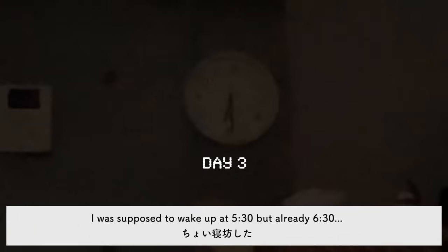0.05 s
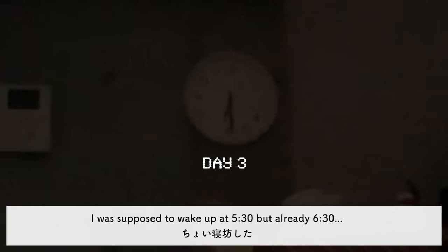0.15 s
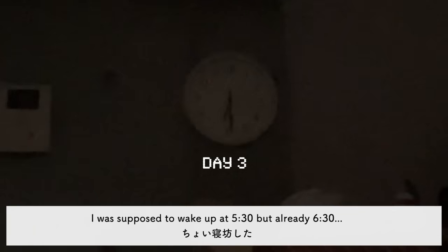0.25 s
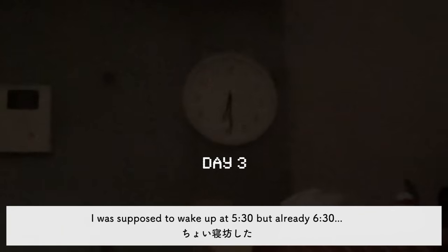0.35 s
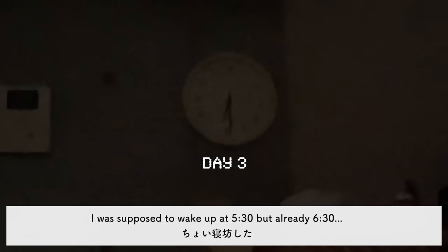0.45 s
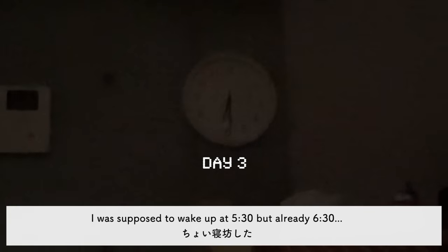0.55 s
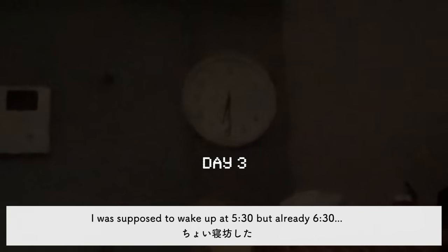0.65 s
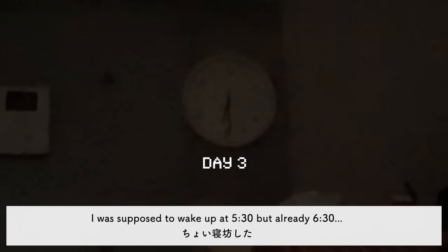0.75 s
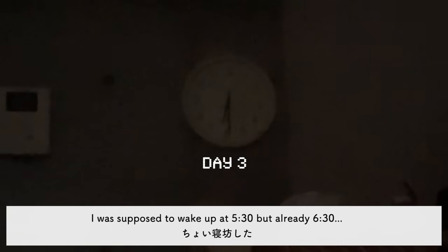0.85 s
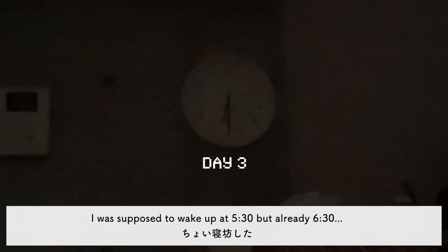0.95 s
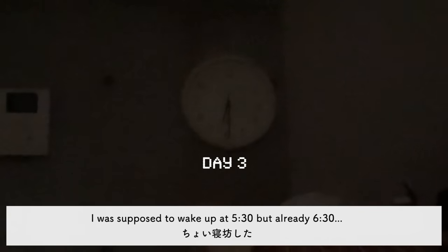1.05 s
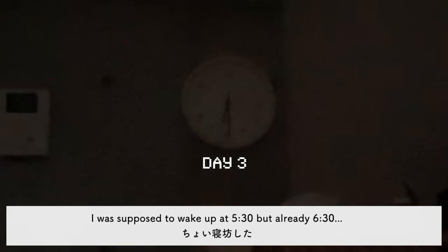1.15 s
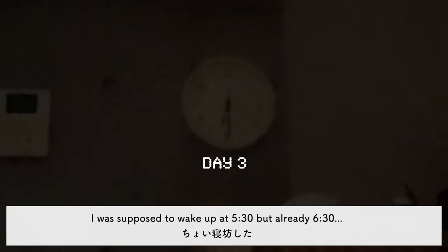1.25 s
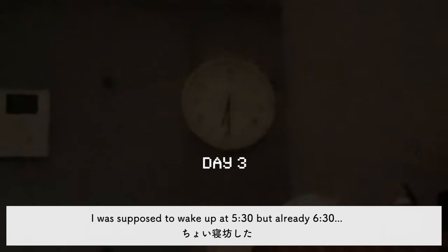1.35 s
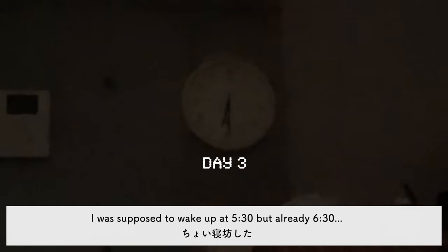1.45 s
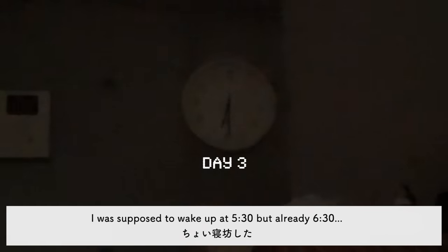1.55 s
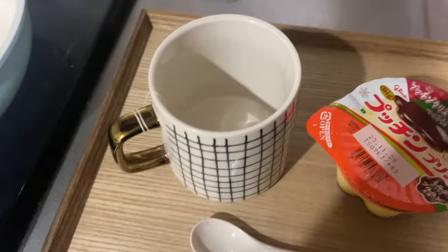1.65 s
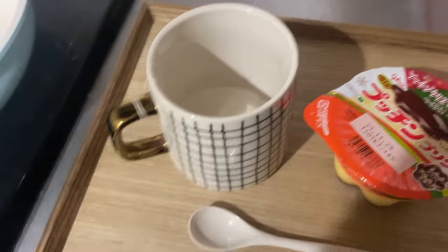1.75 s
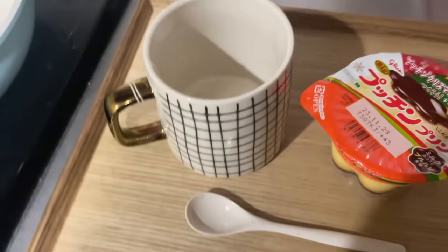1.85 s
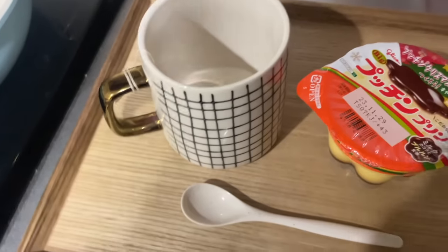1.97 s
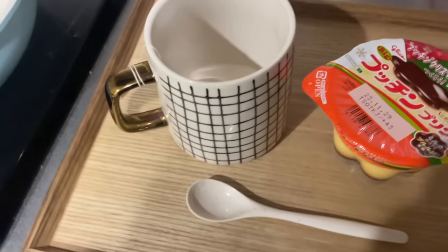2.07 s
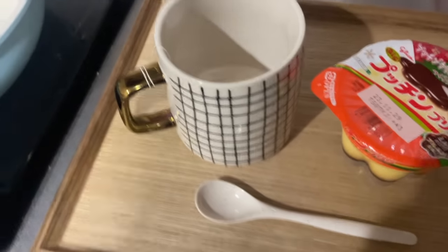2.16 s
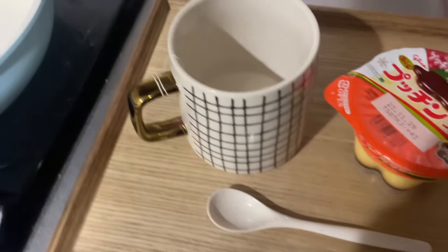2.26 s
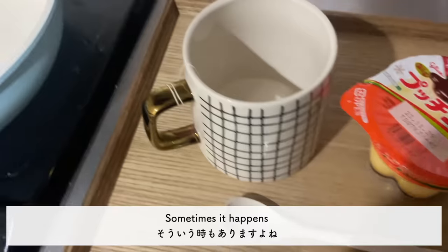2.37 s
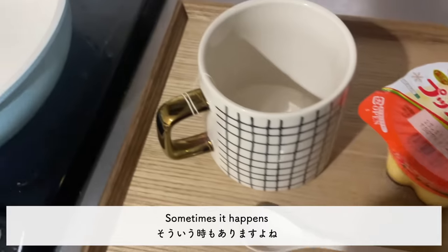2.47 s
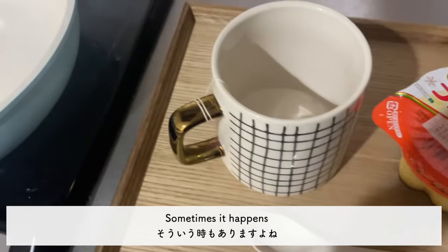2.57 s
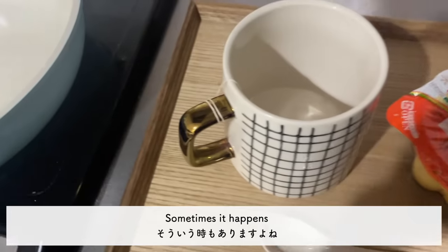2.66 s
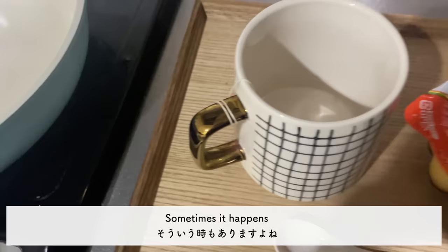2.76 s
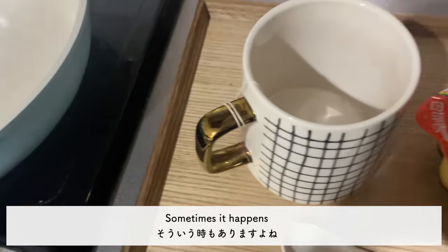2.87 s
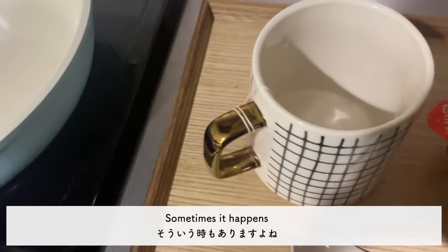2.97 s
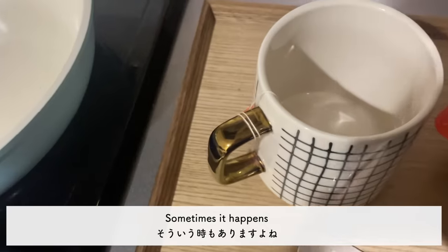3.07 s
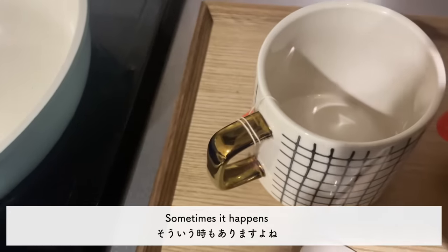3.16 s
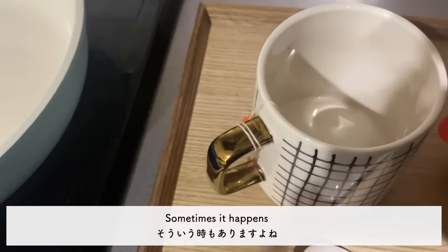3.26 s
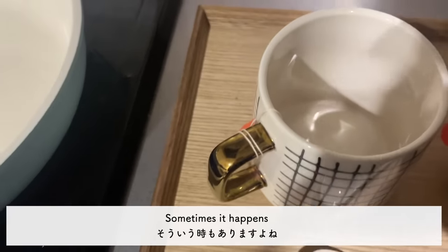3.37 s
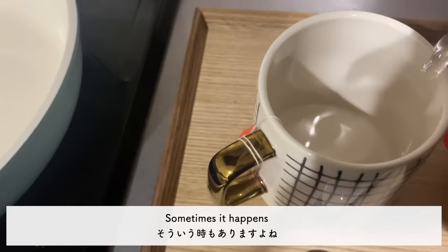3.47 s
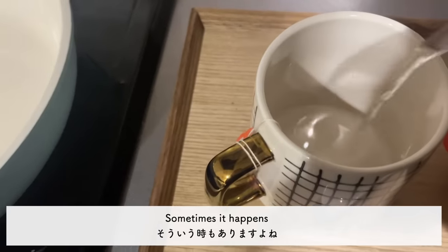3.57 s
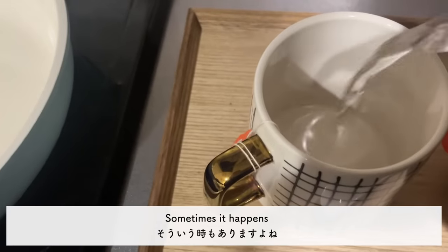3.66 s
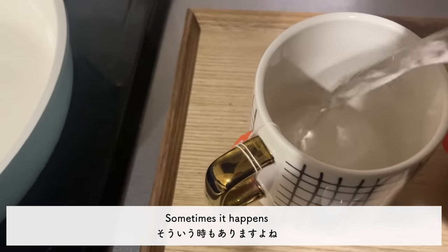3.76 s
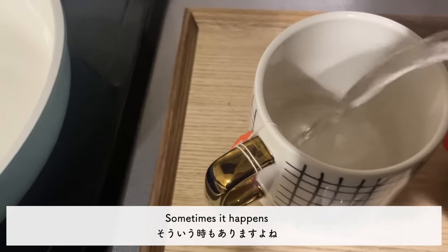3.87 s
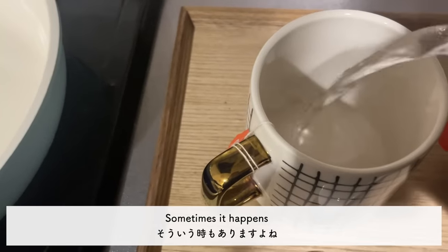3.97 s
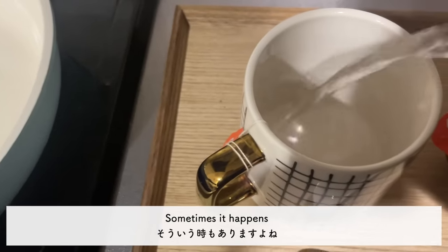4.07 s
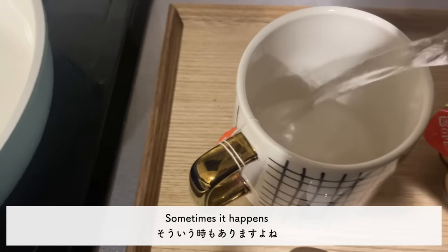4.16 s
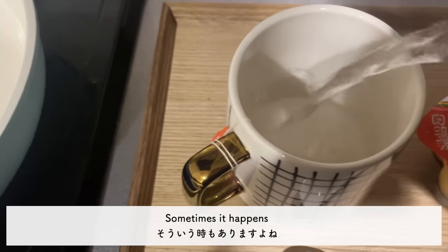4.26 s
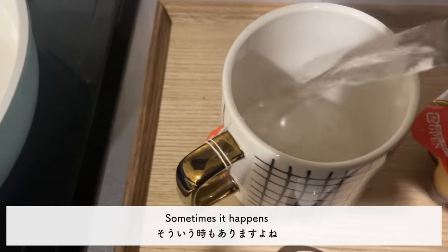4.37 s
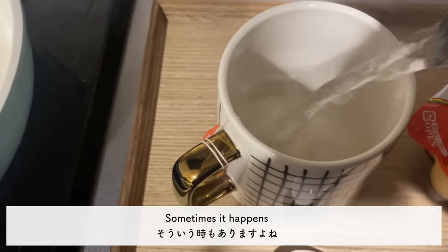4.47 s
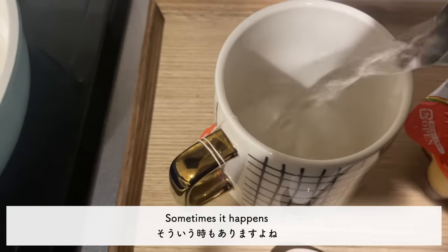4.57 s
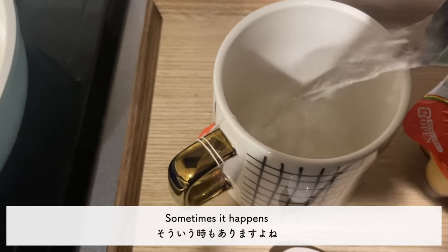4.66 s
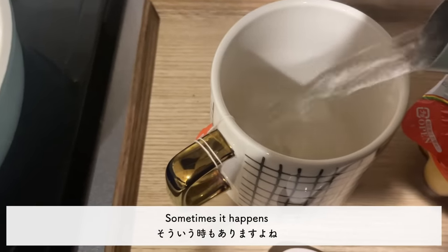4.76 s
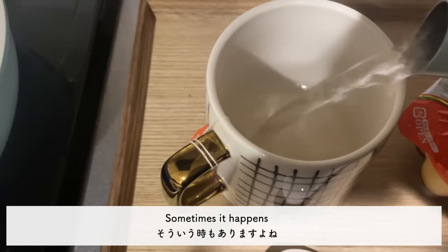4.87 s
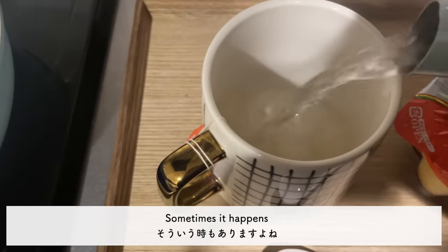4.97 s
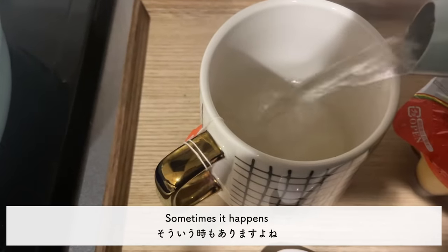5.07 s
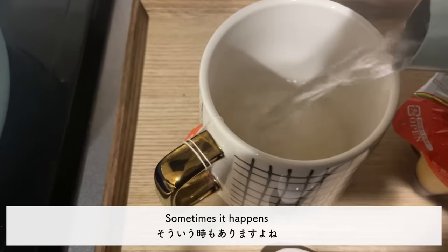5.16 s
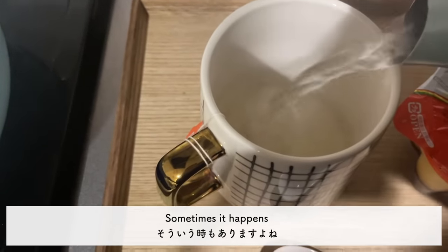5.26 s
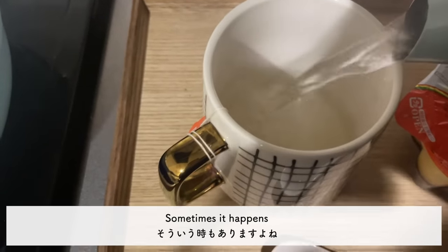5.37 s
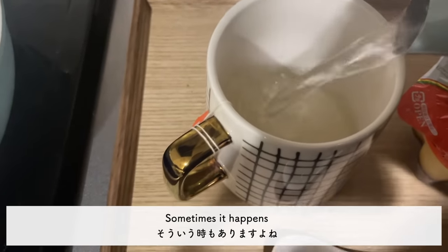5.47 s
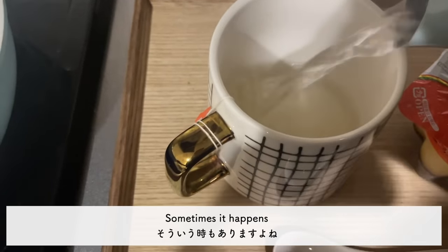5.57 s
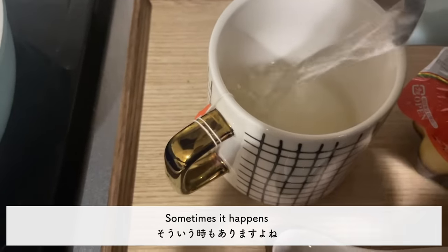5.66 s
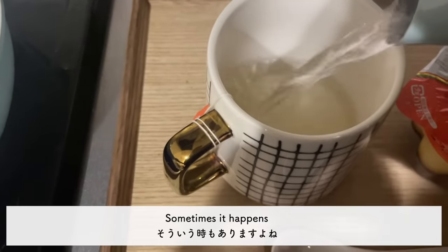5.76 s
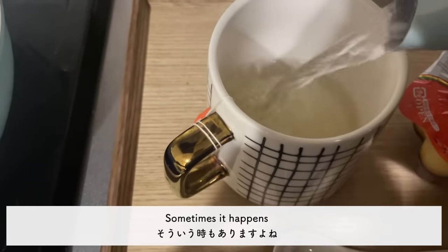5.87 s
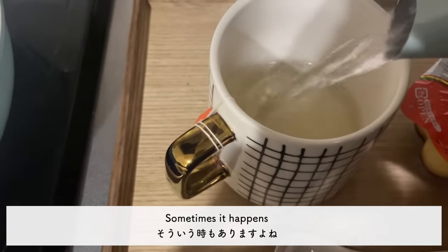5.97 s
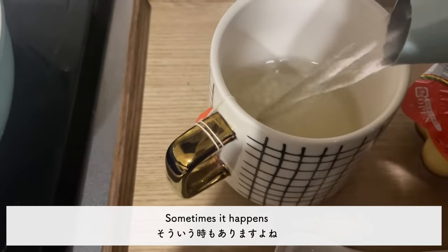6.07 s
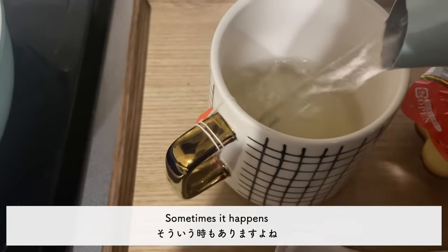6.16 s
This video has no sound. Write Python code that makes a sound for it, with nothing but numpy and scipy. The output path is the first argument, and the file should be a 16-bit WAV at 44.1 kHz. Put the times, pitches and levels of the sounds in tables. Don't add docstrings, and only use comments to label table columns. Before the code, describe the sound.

Near-silent room hush jumps to a closer kitchen with a dull floorboard thump, light clicks, a kettle knock, then water splashing into a ceramic mug.

```python
import sys
import numpy as np
from scipy import signal
from scipy.fft import rfft, irfft
from scipy.io import wavfile
from scipy.ndimage import uniform_filter1d

SR = 44100
rng = np.random.default_rng(int(sys.argv[2]) if len(sys.argv) > 2 else 0)


def elevation(decibels):
    levels = np.asarray(decibels, float)
    return 10 ** (levels / 20)


def store_wav(level_fs):
    pcm = np.round(np.clip(np.atleast_2d(level_fs), -1, 1) * 32767)
    wavfile.write(sys.argv[1], SR, pcm.T.astype(np.int16))


N = 274335
SCENE_CHANGE_S = 1.666

# frequency in Hz, density in dB per Hz.
QUIET_SPECTRUM = [(82, -36), (140, 0), (189, -16), (231, -3), (293, -10), (677, -10.5), (748, -12.5),
                  (896, -9.5), (1180, -17), (2070, -27), (7000, -34), (12300, -35.5), (13300, -34.5),
                  (14600, -55)]
# frequency in Hz, density in dB per Hz.
KITCHEN_SPECTRUM = [(82, -38), (140, 3.5), (189, -17.5), (287, -10), (454, -21), (830, -17.5), (970, -25.5),
                    (1330, -30), (1540, -32.5), (2680, -46), (7430, -55), (11500, -52), (13300, -48),
                    (15000, -75)]
QUIET_DB, KITCHEN_DB = -74.5, -59

# time in seconds, level in dB.
TREMOR = [(1.67, -42), (1.77, -37), (1.96, -49), (2.12, -46), (2.49, -53), (2.63, -48), (3.05, -45.5),
          (3.12, -53.5), (3.22, -45), (3.42, -46), (3.5, -39), (3.58, -37.5), (3.87, -50), (3.94, -43.5),
          (4.35, -48), (4.85, -43), (5.31, -50), (6.23, -48.5)]
# frequency in Hz, width in Hz, level in dB.
RUMBLE_MODES = [(53.53, 12.2, 10.5), (72.9, 11, 2), (90.5, 34.6, 5), (141, 20, -6)]
QUIET_RUMBLE_DB, QUIET_LURCH_DB = -62, 2

# start in seconds, peak in dB, board frequency in Hz,
# rattle in dB relative to the boom.
FOOTFALL = [
    (1.668, -30, 142.9, -15),
    (1.715, -28.5, 156.4, -12.5),
    (1.85, -41, 151.6, -17),
]
# frequency in Hz, width in Hz, level in dB.
BOARD_RATTLE = [(170, 21, -35), (370, 32, -8), (290, 66, -17.5), (820, 550, -27.5)]
LOAD_S, BOARD_DB_PER_S = 0.019, -210
# start in seconds, peak in dB, frequency in Hz,
# T60 in seconds.
BUMPS = [(0.63, -66, 1134, 0.098), (0.706, -68, 1020, .07), (0.712, -72, 1800, .05),
         (2.034, -23, 79, 0.088), (2.012, -41, 356, 0.03), (2.3, -62.5, 1390, 0.16),
         (2.301, -39, 1150, .04), (2.698, -49, 850, .045), (2.699, -52, 1600, .035),
         (2.843, -46, 258, 0.047), (3.215, -35.5, 300, 0.024), (3.506, -22.5, 97.4, 0.18),
         (3.509, -31, 54.1, 0.41), (3.503, -32, 150, 0.4), (3.499, -34.5, 392, 0.37),
         (3.556, -67.5, 6770, 0.13), (3.456, -25, 250, 0.058), (3.4854, -19, 1293, 0.038),
         (3.487, -24, 996, 0.025), (3.4875, -11.5, 580, 0.022), (3.4845, -23.5, 2270, 0.017),
         (3.513, -23.5, 385, 0.055), (3.488, -18.5, 800, .03), (3.488, -20.5, 460, 0.024),
         (3.498, -35, 680, 0.087), (3.498, -38, 554, 0.092), (3.5, -39.5, 824, 0.24),
         (2.024, -49, 4050, 0.012), (4.288, -39, 1600, .012)]
FLOOR_TOP_HZ = 320

# start in seconds, peak in dB, treble in dB relative to it, smear in seconds,
# focus in Hz.
CLICKS = [(1.76, -57.5, 1, 0.027, 4200), (2.021, -46, -9, 0.0072, 3920), (2.293, -58, -14, 0.0071, 3000),
          (2.3, -37, -3.5, 0.0022, 1470), (2.302, -38, -34, 0.01, 1150), (2.315, -39, -5, 0.0025, 3660),
          (2.599, -77, 10, .004, 1400), (2.61, -73, 14, .002, 1400), (2.692, -55, -18, 0.0034, 6500),
          (2.697, -43.5, -19, 0.011, 1000), (2.754, -55.5, -20, 0.0027, 3450),
          (3.455, -34, -6.5, 0.013, 900), (3.4852, -25.5, -24, 0.0068, 2200),
          (3.513, -41, -6, 0.0057, 6500), (3.556, -56.5, -2, 0.014, 4940), (3.585, -61, -3, 0.023, 2900)]
# frequency in Hz, density in dB per Hz.
CLICK_SPECTRUM = [(180, -11.5), (300, -2), (501, -7.5), (1180, -6.5), (1400, -15), (1960, -9),
                  (2760, -14.5), (9000, -28), (11700, -82), (19800, -120)]
# time in seconds, level in dB.
SLIDES = [
    [(2.08, -72), (2.098, -83), (2.106, -68), (2.2, -84)],
    [(2.36, -71), (2.378, -81), (2.434, -74), (2.46, -109)],
    [(3.12, -92), (3.244, -70), (3.414, -74), (3.446, -68), (3.454, -72), (3.46, -55)],
]
# frequency in Hz, density in dB per Hz.
SLIDE_SPECTRUM = [(590, -24), (1000, -7), (1790, -25), (1940, -22), (2870, -17), (6470, -26), (8360, -32),
                  (13100, -31), (16000, -48)]

# start in seconds, level in dB.
KNOCKS = [
    (3.453, -36),
    (3.484, -25.5),
    (3.488, -25),
    (3.513, -62),
]
# frequency in Hz, level in dB, T60 in seconds.
KETTLE = [(250, -16, 0.072), (387, -10.5, 0.07), (462, -4, 0.033), (556, -6, 0.019), (680, -3, 0.028),
          (820, 1, 0.035), (1280, -8, 0.027), (2200, -33, .018)]

# time in seconds, flow level in dB, break-up into spray in dB.
POUR = [(3.74, -80, -21), (3.86, -75, 8), (3.99, -69.5, 4), (4.11, -65, 2), (4.36, -62, 1.5),
        (4.47, -58, -4), (4.83, -53, 1.5), (5.04, -60.5, 0), (5.22, -59, -8), (5.36, -58.5, -4),
        (5.71, -62.5, -4), (5.91, -60, -1.5), (6.09, -58.5, -9), (6.22, -64.5, 0)]
# frequency in Hz, width in Hz, level in dB.
AIR_COLUMN = [(472, 91, 2), (860, 123, 10.5), (983, 170, 2.5), (1100, 380, 0.5), (1595, 220, 2)]
# frequency in Hz, width in Hz, level in dB.
WALL = [(2360, 260, -3), (3020, 260, 3), (3700, 800, -6), (4600, 360, -2), (5600, 1000, -9),
        (6950, 500, -4)]
# frequency in Hz, width in Hz, level in dB.
GLAZE = [(6500, 84, 1.5), (13400, 130, -3)]
# frequency in Hz, width in Hz, level in dB.
PORT = [(12260, 950, -4.5), (9670, 2430, -2.5), (13600, 2000, -10.5)]
# start in seconds, peak in dB, cavity frequency in Hz.
PLOPS = [(4.664, -31.5, 1760), (4.692, -34, 1050), (4.735, -36, 955), (4.78, -30.5, 890), (4.881, -41, 820),
         (4.962, -37.5, 860), (4.987, -39, 1410), (5.141, -33, 1430), (5.201, -33, 910),
         (5.213, -25.5, 1000), (5.263, -30.5, 980), (5.437, -41, 1250), (5.445, -25.5, 890),
         (5.48, -38.5, 1010), (5.531, -33, 960), (5.589, -29.5, 890), (5.639, -27, 870), (5.684, -26, 970),
         (5.738, -37, 910), (5.766, -24.5, 910), (5.788, -29.5, 1010), (5.807, -34, 895),
         (5.841, -32.5, 950), (5.898, -34.5, 940), (5.916, -32, 896), (5.977, -36, 950), (6.017, -39, 1300),
         (6.026, -27, 1030), (6.059, -33.5, 1010), (6.102, -31, 1005), (6.152, -41.5, 1100),
         (6.195, -30.5, 920)]
# start in seconds, peak in dB, cavity frequency in Hz.
BLIPS = [(4.4, -42, 1530), (4.533, -46, 840), (4.547, -37, 824), (4.609, -43, 1780), (4.625, -37, 840),
         (4.65, -38, 1470), (4.676, -34, 1190), (4.721, -39, 860), (4.76, -32.5, 840), (4.808, -36, 824),
         (4.895, -48, 1110), (4.929, -37.5, 1040), (5.0, -34, 1710), (5.017, -37.5, 786), (5.043, -36, 829),
         (5.107, -36, 1080), (5.154, -40, 915), (5.241, -29.5, 834), (5.267, -36, 1030), (5.283, -36, 1140),
         (5.298, -33, 1070), (5.327, -42, 929), (5.344, -33.5, 920), (5.359, -31.5, 926), (5.37, -44, 907),
         (5.396, -44, 1330), (5.408, -35.5, 929), (5.497, -34, 926), (5.516, -40, 1120), (5.693, -35, 982),
         (5.73, -41, 939), (5.845, -32, 918), (5.943, -43, 934), (5.955, -42, 1030), (5.994, -38, 945),
         (6.038, -38, 1030), (6.073, -39, 1050), (6.089, -40, 1010), (6.117, -40, 832)]
# start in seconds, peak in dB, bubble frequency in Hz.
SPLASHES = [(3.78, -54.5, 2530), (3.8395, -45.5, 3550), (3.972, -46, 2420), (4.0132, -40.5, 2430),
            (4.091, -45, 2300), (4.172, -33.5, 5530), (4.223, -36, 3370), (4.346, -40, 2850),
            (4.388, -37, 3720), (4.398, -30.5, 2800), (4.4335, -29, 2520), (4.4835, -36, 3030),
            (4.4961, -24.5, 3850), (4.538, -37, 2720), (4.5965, -37.5, 2380), (4.6035, -34, 2400),
            (4.6658, -30, 2600), (4.735, -40, 2900), (4.757, -34, 2540), (4.816, -33, 2940),
            (4.8768, -34, 3200), (4.971, -36.5, 2960), (4.999, -37, 2370), (5.0532, -41.5, 3060),
            (5.102, -37, 3040), (5.133, -37, 3100), (5.2356, -34.5, 3060), (5.3923, -35.5, 3460),
            (5.5172, -31, 2330), (6.0259, -27, 3060)]
# start in seconds, peak in dB, bubble frequency in Hz.
DRIPS = [(3.9585, -54, 2310), (4.024, -50, 2850), (4.0394, -55, 2840), (4.1487, -47, 5440),
         (4.1814, -42.5, 2000), (4.1868, -39.5, 2820), (4.218, -41.5, 3600), (4.2586, -47, 6500),
         (4.304, -46, 2670), (4.3534, -48, 2690), (4.4108, -34.5, 2700), (4.4478, -33.5, 2330),
         (4.4554, -37, 3700), (4.511, -39, 3000), (4.584, -46, 2330), (4.6107, -36.5, 2370),
         (4.7788, -35, 2930), (4.8602, -49, 2840), (4.895, -46, 2790), (4.9603, -37, 2860),
         (5.088, -44, 3100), (5.142, -40, 3150), (5.3018, -48, 7220), (5.3153, -42, 3060),
         (5.436, -40.5, 3060), (5.6126, -39, 6710), (5.6594, -48, 3070), (5.7346, -43, 2940),
         (5.8283, -37.5, 3120), (5.9554, -44, 2850), (5.994, -41.5, 3100)]
# start in seconds, peak in dB.
BURSTS = [(3.8082, -57), (3.8717, -45.5), (3.933, -56), (3.95, -48), (4.1156, -48), (4.1709, -47),
          (4.2722, -37), (4.3205, -39), (4.345, -38), (4.3874, -36.5), (4.4108, -33), (4.4235, -32),
          (4.4333, -36), (4.4443, -29), (4.4567, -24), (4.4788, -30), (4.497, -35), (4.511, -35),
          (4.571, -46.5), (4.6368, -40), (4.7112, -41), (4.7336, -38), (4.7555, -38), (4.8024, -42),
          (4.835, -33), (4.8627, -39), (4.9262, -48), (4.9262, -42), (4.9716, -33), (5.0067, -31),
          (5.0873, -47), (5.1182, -56), (5.1184, -39.5), (5.212, -63), (5.212, -53), (5.2342, -31.5),
          (5.3018, -49), (5.302, -38.5), (5.3582, -44), (5.402, -36), (5.4353, -32), (5.48, -32.5),
          (5.518, -40), (5.5467, -34.5), (5.588, -45), (5.6382, -40.5), (5.6858, -48), (5.7362, -31.5),
          (5.765, -50), (5.7867, -44), (5.8072, -52), (5.8072, -39), (5.8989, -50), (5.9853, -50),
          (5.9849, -37), (6.0267, -48), (6.0265, -32), (6.102, -42), (6.1638, -49), (6.1955, -42)]
POOL_S, POOL_FILL_S = 4.02, 0.78
GURGLE_BARE_DB, GURGLE_POOL_DB = -4, 7
LOW_NOTE_S, LOW_NOTE_RISE_S, LOW_NOTE_DB = 5.16, 0.69, -10
SING_S, SING_RISE_S, SING_DB = 4.1, 0.087, 3
PLOP_CYCLES, BIG_PLOP_DB, CYCLES_PER_DB = 10.9, -25, 0.3
PLOP_RISE_CYCLES = 0.52
SHALLOW_GLIDE, DEEP_GLIDE, DEEP_LIFT = 0.22, -0.39, 0.1
SLAP_DB, SLAP_HZ = -11.5, 3060
PLOP_SPRAY_DB, SPLASH_SPRAY_DB, BURST_DB = -14, -11, 3.5
BLIP_DB, BLIP_CYCLES, BLIP_GLIDE, BLIP_SLAP_DB = 4.0, 11.4, 0.097, -13
DRIP_DB, SLOSH_DB = 1.5, 4.0

# frequency in Hz, T60 in seconds.
ROOM = [(60, 0.41), (300, 0.36), (1000, 0.17), (4000, 0.15), (16000, 0.069)]
# frequency in Hz, lead of the left port in radians.
LEAD = [(60, 0), (600, .9), (950, .3), (1300, .1), (2580, 1.2), (4600, 1.2), (5200, 1.9), (5860, -2),
        (6720, -1.1), (7580, -2.5), (10100, -3.8), (13000, -6.2), (16400, -6.4)]
# frequency in Hz, likeness from 0 to 1.
COHERENCE = [(40, 1), (90, 0.91), (200, 0.87), (640, 0.33), (1400, 0.55), (5000, 0.68), (9000, 0.93),
             (15000, 0.46)]
# frequency in Hz, left minus right in dB.
LEAN = [(60, -2), (110, -2), (200, -2.5), (380, -2), (700, 6.5), (1290, 2), (2380, 3.5), (4400, 2),
        (8120, 4), (15000, -2.5)]
WALL_ECHO, ECHO_LEFT_S, ECHO_RIGHT_S = .4, .0007, .0012
KNOCK_LAG_S = .0004


def evened(x):
    return x / np.sqrt(np.mean(x ** 2) + 1e-20)


def read(points, hz):
    f, value = np.transpose(points)
    return np.interp(np.log(hz + 1), np.log(f + 1), value)


def curve(rows, column=1):
    rows = np.asarray(rows)
    gain = elevation(np.interp(np.arange(N) / SR, rows[:, 0], rows[:, column], -200, -200))
    return uniform_filter1d(gain, size=60)


def add(mix, s, sound):
    part = mix[round(s * SR):][:len(sound)]
    part += sound[:len(part)]


def shaped(x, points):
    return irfft(rfft(x) * elevation(read(points, np.fft.rfftfreq(len(x), 1 / SR))), len(x))


def filtered(x, order, hz, kind="low"):
    return signal.sosfilt(signal.butter(order, hz, kind, fs=SR, output="sos"), x)


def resonate(x, modes):
    out = np.zeros(len(x))
    for hz, width, db in modes:
        out += elevation(db) * signal.lfilter(*signal.iirpeak(hz, hz / width, SR), x)
    return out


def ring(hz, t60, glide=0.):
    t = np.arange(round(t60 * SR)) / SR
    return elevation(-60 * t / t60) * np.sin(2 * np.pi * hz * t * (1 + glide * t / t60))


def opening(sound, hz, cycles):
    return sound * np.minimum(np.arange(len(sound)) * hz / SR / cycles, 1)


def train(rows):
    out = np.zeros(N)
    for s, db, *_ in rows:
        out[round(s * SR)] = elevation(db)
    return out


def puffs(clicks_in, length_s):
    fall, rise = np.exp(-1 / (length_s * SR)), np.exp(-2.5 / (length_s * SR))
    envelope = signal.lfilter([1 - rise], np.convolve([1, -fall], [1, -rise]), clicks_in)
    return envelope * rng.standard_normal(N)


def spatter(per_s, spread_db):
    sizes = elevation(spread_db * np.minimum(rng.exponential(1, N), 3.5))
    return sizes * (rng.random(N) < per_s / SR)


def clumps(per_s, depth_db):
    knots = rng.standard_normal(round(N / SR * 60) + 2)
    return elevation(depth_db * np.interp(np.arange(N) / SR * per_s, np.arange(len(knots)), knots))


def bright(x):
    return resonate(resonate(x, PORT), [(11500, 22000, 0)])


def air():
    quiet = evened(filtered(shaped(rng.standard_normal(N), QUIET_SPECTRUM), 4, 150, "high"))
    kitchen = evened(filtered(shaped(rng.standard_normal(N), KITCHEN_SPECTRUM), 4, 150, "high"))
    after = np.arange(N) >= SCENE_CHANGE_S * SR
    return np.where(after, elevation(KITCHEN_DB) * kitchen, elevation(QUIET_DB) * quiet)


def rumble():
    low = resonate(resonate(rng.standard_normal(N), RUMBLE_MODES), RUMBLE_MODES)
    before = np.arange(N) < SCENE_CHANGE_S * SR
    quiet = elevation(QUIET_RUMBLE_DB) * clumps(8.4, depth_db=QUIET_LURCH_DB) * before
    return (quiet + curve(TREMOR)) * evened(low)


def bumps(lo_hz, hi_hz):
    out = np.zeros(N)
    for s, db, hz, t60 in BUMPS:
        if lo_hz <= hz < hi_hz:
            add(out, s, elevation(db) * opening(ring(hz, t60), hz, 0.67))
    return out


def step():
    rattle = evened(resonate(resonate(rng.standard_normal(N), BOARD_RATTLE), [(300, 550, 0)]))
    rattle = filtered(rattle, 2, 1500)
    out, t = np.zeros(N), np.arange(SR // 3) / SR
    for s, db, hz, rattle_db in FOOTFALL:
        load = np.minimum(t / LOAD_S, 1) * elevation(db + BOARD_DB_PER_S * np.maximum(t - LOAD_S, 0))
        boom = np.sqrt(2) * np.sin(2 * np.pi * hz * t)
        add(out, s, load * (boom + elevation(rattle_db) * rattle[round(s * SR):][:len(t)]))
    return out + bumps(0, FLOOR_TOP_HZ)


def clicks():
    body = evened(shaped(rng.standard_normal(N), CLICK_SPECTRUM))
    edge = evened(bright(rng.standard_normal(N)))
    friction = evened(shaped(rng.standard_normal(N), SLIDE_SPECTRUM))
    out = sum(curve(rows) for rows in SLIDES) * friction
    out[round(SCENE_CHANGE_S * SR)] += elevation(-37)
    t = np.arange(4000) / SR
    for s, db, treble_db, smear, hz in CLICKS:
        at = slice(round(s * SR), round(s * SR) + len(t))
        focus = evened(resonate(body[at], [(hz, 0.69 * hz, 0)]))
        tick = body[at] + 0.82 * focus + elevation(treble_db) * edge[at] * np.exp(-t / 0.05)
        envelope = np.exp(-t / smear) * (1 - np.exp(-t / 0.00013))
        add(out, s, elevation(db - 8.0) * envelope * tick)
    return out


def knock():
    blows, body = train(KNOCKS), np.zeros(SR // 2)
    hz_at, db_at, t60_at = np.transpose(KETTLE)
    for k, phase in enumerate(rng.random(30)):
        hz = 240 * 1.085 ** k
        level = elevation(np.interp(hz, hz_at, db_at) - 4.5)
        add(body, phase / hz, level * ring(hz, np.interp(hz, hz_at, t60_at)))
    return signal.oaconvolve(0.65 * blows + 0.14 * puffs(blows, 0.0022), body)[:N]


def bubbles(lo_hz, hi_hz, per_s, cycles, count=24):
    out = np.zeros(N)
    for hz in np.geomspace(lo_hz, hi_hz, count):
        births = spatter(per_s / count, spread_db=4.0)
        out += signal.oaconvolve(births, ring(hz, cycles / hz, glide=.2))[:N]
    return evened(out)


def wall(x):
    wet = sum(clumps(18 + 3 * k, depth_db=SLOSH_DB) * resonate(x, [mode]) for k, mode in enumerate(WALL))
    return filtered(wet, 4, 7900)


def stream():
    t = np.arange(N) / SR
    drops, hiss = spatter(500, spread_db=4.5), rng.standard_normal(N)
    slugs = spatter(160, spread_db=4.0) + .03 * hiss

    gurgle = evened(resonate(resonate(slugs, AIR_COLUMN[1:]), AIR_COLUMN[1:]))
    low = evened(resonate(resonate(slugs, AIR_COLUMN[:1]), AIR_COLUMN[:1]))
    gurgle = filtered(gurgle, 3, 700, "high")
    gurgle += elevation(LOW_NOTE_DB) * np.clip((t - LOW_NOTE_S) / LOW_NOTE_RISE_S, 0, 1) * low
    gurgle += .9 * bubbles(600, 1900, 130, cycles=22.0)

    splash = evened(wall(puffs(drops, 0.0008) + 0.79 * drops + 0.095 * hiss))
    splash += 0.61 * bubbles(1840, 7000, 380, cycles=15.0)
    bare = np.clip((4.6 - t) / 0.17, 0, 1)
    bare *= np.clip((t - SING_S) / SING_RISE_S, 0, 1)
    splash += 0.5 * bare * evened(resonate(resonate(spatter(200, spread_db=3.0), GLAZE), GLAZE))

    spray = bright(puffs(drops + spatter(500, spread_db=7.5), 0.0011) + 0.13 * hiss)
    spray = filtered(spray, 2, 9800, "high")

    uneven = clumps(35, depth_db=3.0)
    s, _, breakup_db = np.transpose(POUR)
    pool_db = np.interp(t, [POOL_S, POOL_S + POOL_FILL_S], [GURGLE_BARE_DB, GURGLE_POOL_DB])
    mix = elevation(pool_db) * evened(uneven * gurgle) + evened(uneven * splash)
    mix += elevation(np.interp(t, s, breakup_db)) * evened(uneven * spray)
    return curve(POUR) * mix


def cavities():
    out = np.zeros(N)
    for s, db, hz in PLOPS:
        cycles = max(PLOP_CYCLES + CYCLES_PER_DB * (BIG_PLOP_DB - db), 3)
        sag = np.clip((s - 5.0) / .5, 0, 1) * np.clip((db + 37) / 9.6, .2, 1)
        glide = SHALLOW_GLIDE + (DEEP_GLIDE - SHALLOW_GLIDE) * sag
        plop = ring(hz * (1 + DEEP_LIFT * sag), cycles / hz, glide=glide)
        add(out, s + 0.00084, elevation(db + 5.0) * opening(plop, hz, PLOP_RISE_CYCLES))
        depth = np.clip((s - 4.9) / 1.61, 0, 1)
        add(out, s + 0.0014, elevation(db + 2.0) * depth * ring(AIR_COLUMN[0][0], 0.022))
    for s, db, hz in BLIPS:
        blip = ring(hz, BLIP_CYCLES / hz, glide=BLIP_GLIDE)
        add(out, s, elevation(db + BLIP_DB) * opening(blip, hz, 0.75))
    return out


def pour():
    out = stream() + cavities()
    drips = [(s, db + DRIP_DB, hz) for s, db, hz in DRIPS]
    slaps = [(s, db + SLAP_DB, SLAP_HZ) for s, db, _ in PLOPS]
    for s, db, hz in [*SPLASHES, *drips, *slaps]:
        add(out, s + 0.00027, elevation(db + 2.0) * ring(hz, 14 / hz, glide=0.012))

    contacts = train([*SPLASHES, *drips]) + elevation(BLIP_SLAP_DB) * train(BLIPS)
    contacts += elevation(SLAP_DB) * np.roll(train(PLOPS), round(.0008 * SR))
    out += elevation(-0.5) * wall(puffs(contacts, 0.0026))
    out += elevation(-3.0) * wall(contacts)

    spray = elevation(BURST_DB) * train(BURSTS) + elevation(PLOP_SPRAY_DB) * train(PLOPS)
    spray += elevation(SPLASH_SPRAY_DB) * train(SPLASHES)
    bare = np.interp(np.arange(N) / SR, [4.0, 4.25, 4.42, 4.6], [.2, 1, 0.86, 0.063])
    out += elevation(SING_DB) * bare * resonate(puffs(spray + contacts, 0.0017), GLAZE)
    return out + elevation(5.5) * bright(puffs(spray, 0.0011))


def room(x):
    taps = np.zeros(SR // 2)
    at = np.arange(200, len(taps) - 20, 20)
    taps[at + rng.integers(0, 20, len(at))] = rng.choice([-1., 1.], len(at))
    hz, t, z = signal.stft(taps, SR, nperseg=512)
    tail = signal.istft(z * elevation(-60 * t / read(ROOM, hz)[:, None]), SR, nperseg=512)[1]
    return signal.fftconvolve(x, tail / np.linalg.norm(tail))[:N]


def ports(alike, left, right):
    hz = np.fft.rfftfreq(N, 1 / SR)
    same = np.clip(read(COHERENCE, hz), 0, 1)
    turn = np.exp(.5j * read(LEAD, hz)) * elevation(read(LEAN, hz) / 2)
    shared, own = np.sqrt(same) * rfft(alike), np.sqrt(1 - same)
    return np.array([irfft(shared * turn + own * rfft(left), N),
                     irfft(shared / turn + own * rfft(right), N)])


def scene():
    hits, water, boards = clicks() + knock() + bumps(FLOOR_TOP_HZ, SR), pour(), step()
    echoing = elevation(-14.0) * hits + elevation(-15.0) * water
    alike, left, right = [room(echoing) + air() + rumble() for _ in range(3)]
    alike += hits + water + boards
    left += WALL_ECHO * np.roll(water, round(ECHO_LEFT_S * SR)) - 0.48 * boards + 0.1 * hits
    right += .5 * boards - WALL_ECHO * np.roll(water, round(ECHO_RIGHT_S * SR))
    right -= 0.2 * np.roll(hits, round(KNOCK_LAG_S * SR))
    return ports(alike, left, right)


def band_limit(x):
    return signal.sosfilt(signal.butter(12, 16810, fs=SR, output="sos"), x)


def record(dry):
    limited = signal.oaconvolve(dry, signal.firwin(201, 16100, fs=SR)[None], "same")
    return band_limit(limited)


dry = scene()
out = record(dry)
store_wav(out)
```